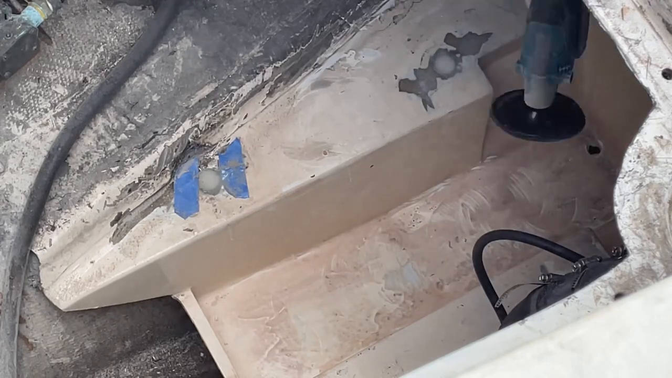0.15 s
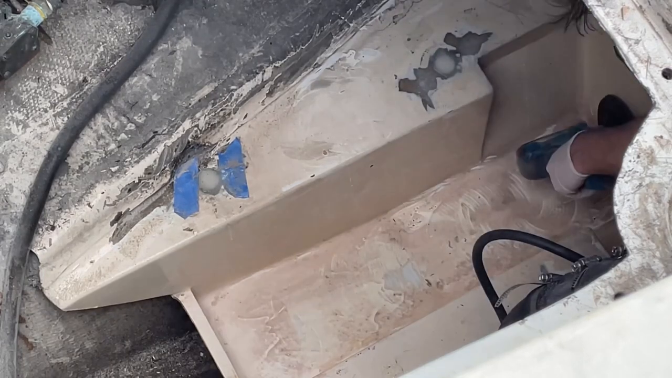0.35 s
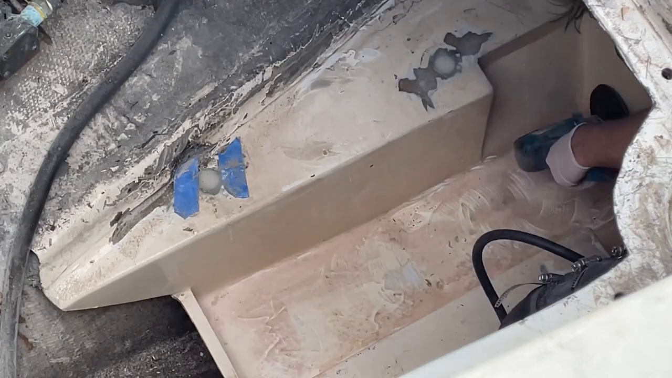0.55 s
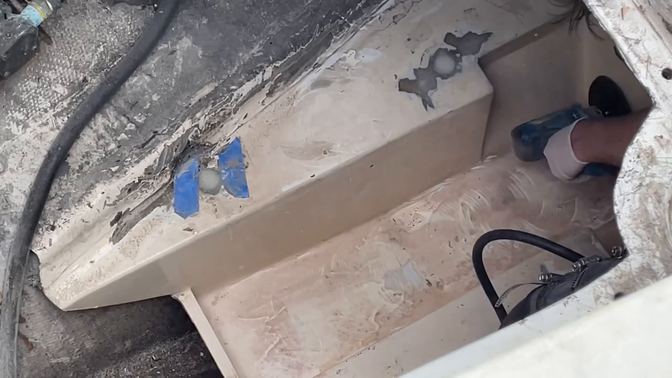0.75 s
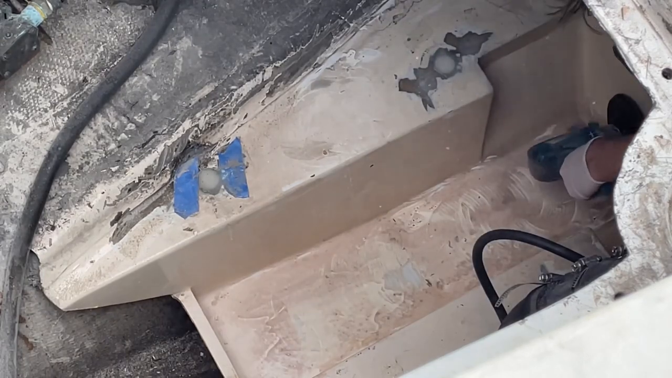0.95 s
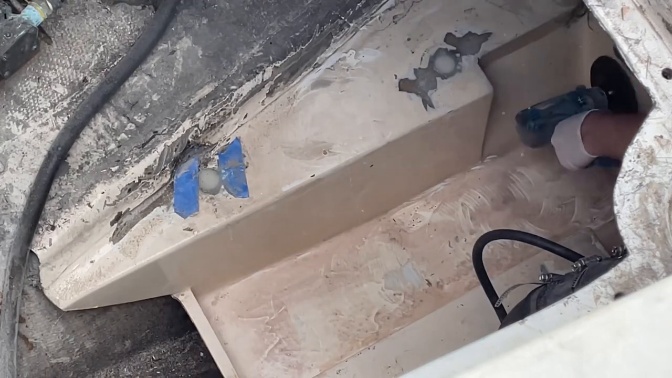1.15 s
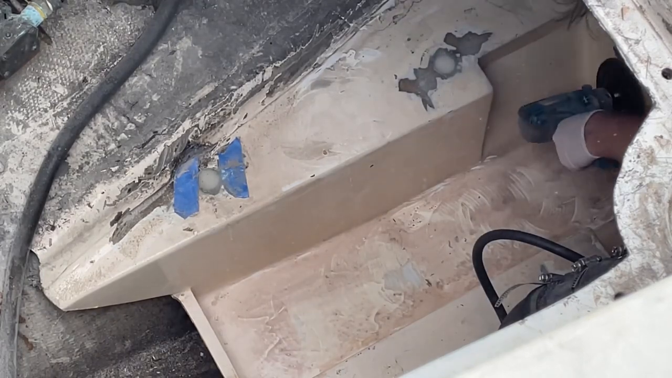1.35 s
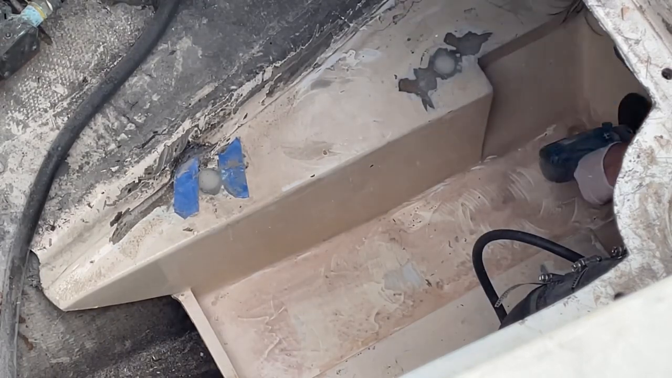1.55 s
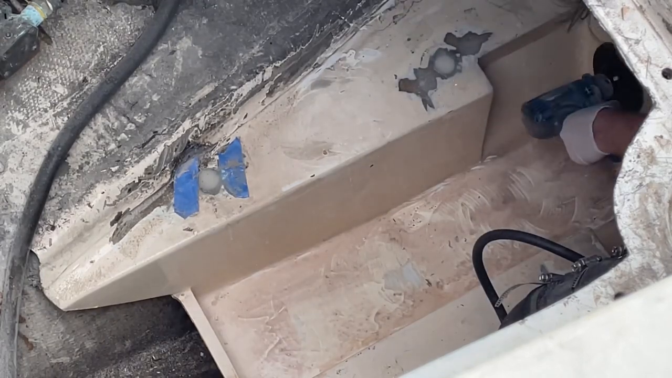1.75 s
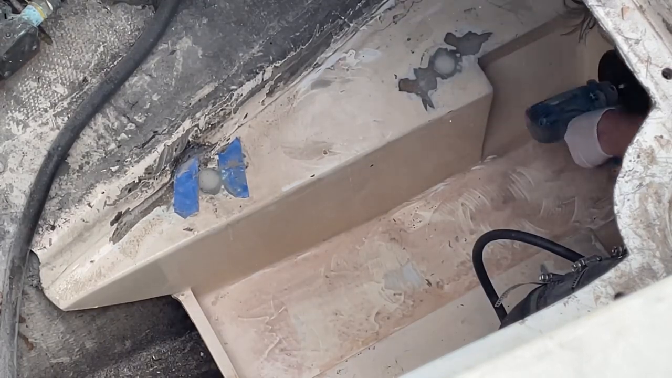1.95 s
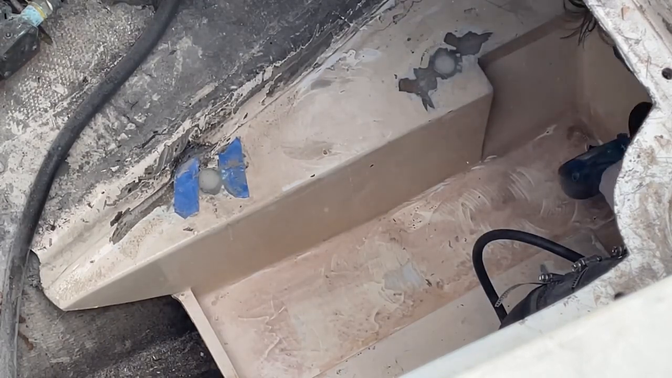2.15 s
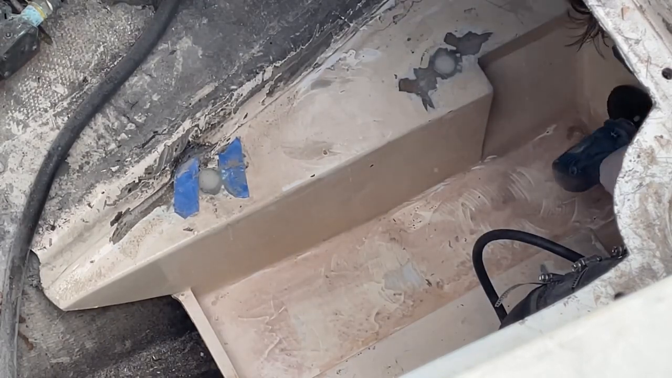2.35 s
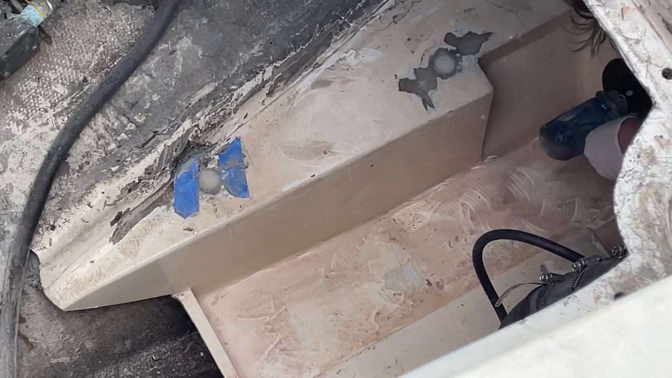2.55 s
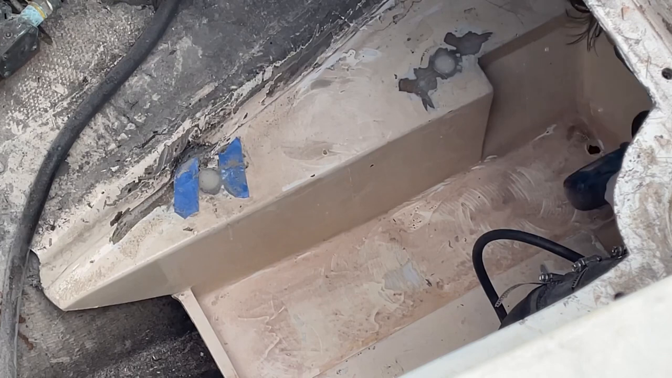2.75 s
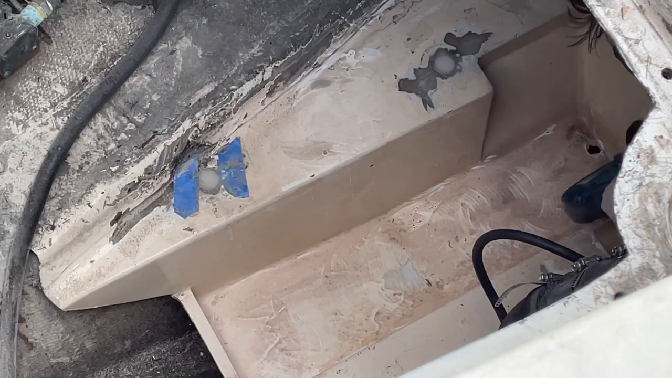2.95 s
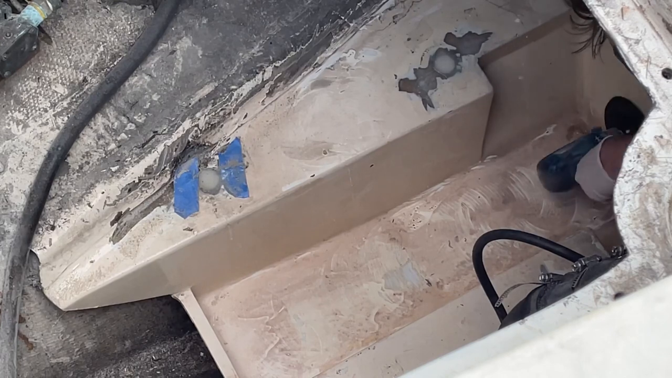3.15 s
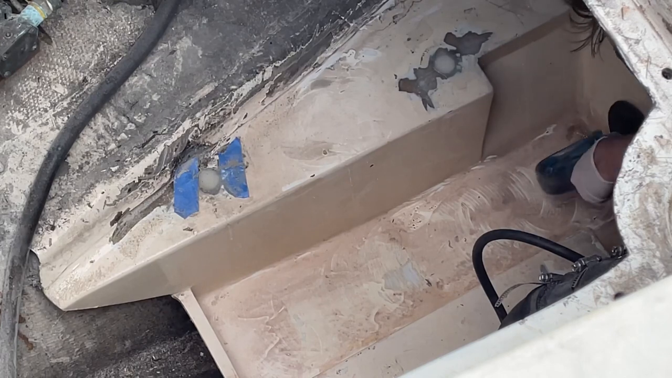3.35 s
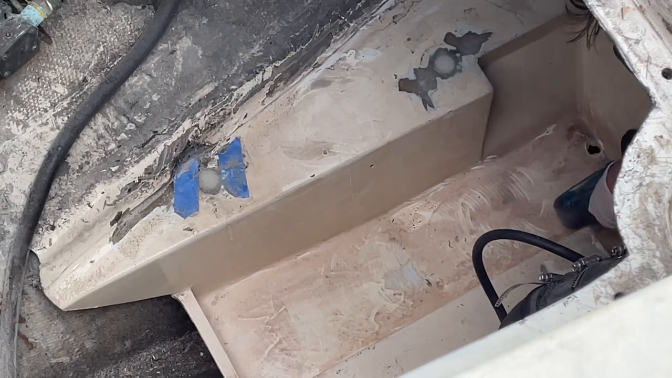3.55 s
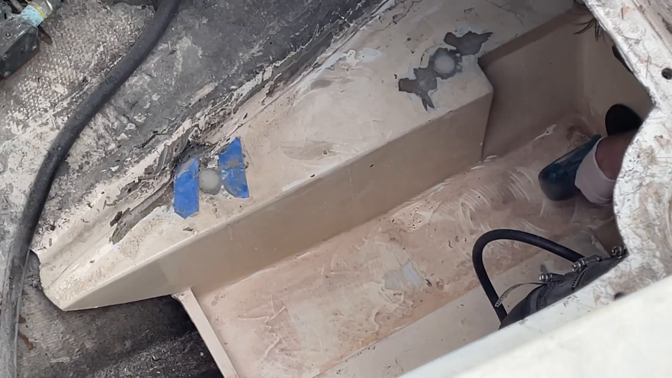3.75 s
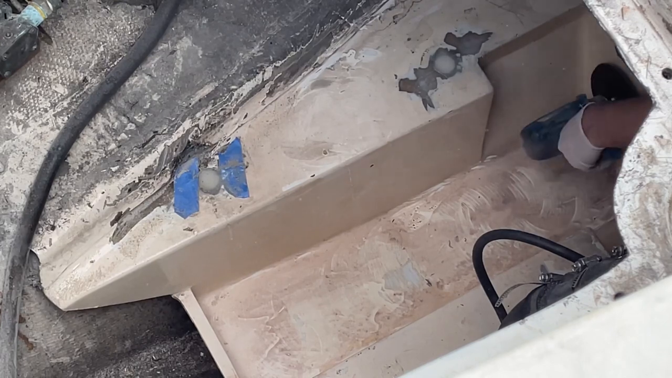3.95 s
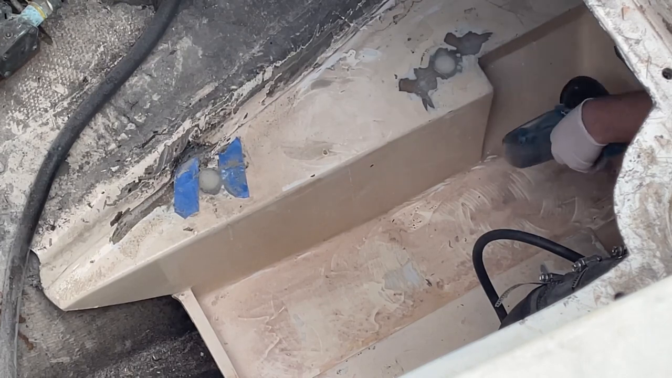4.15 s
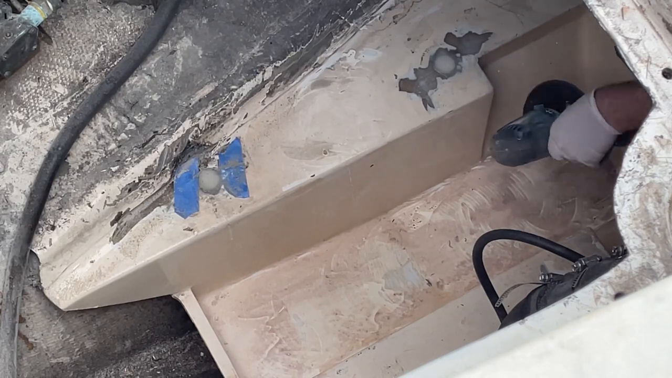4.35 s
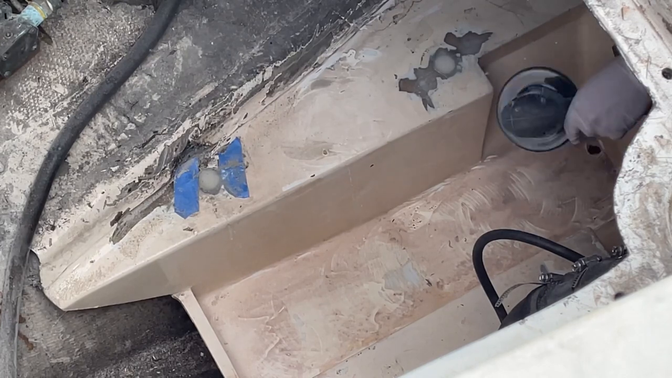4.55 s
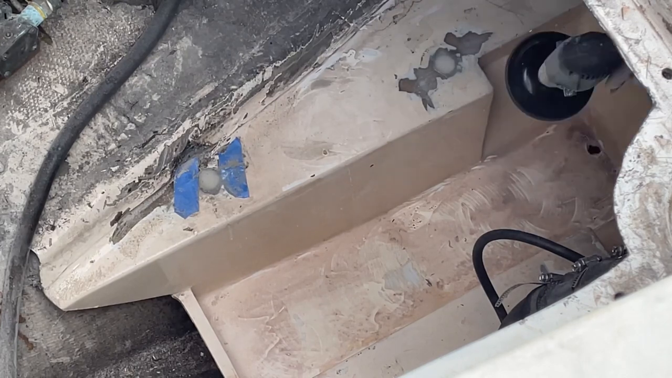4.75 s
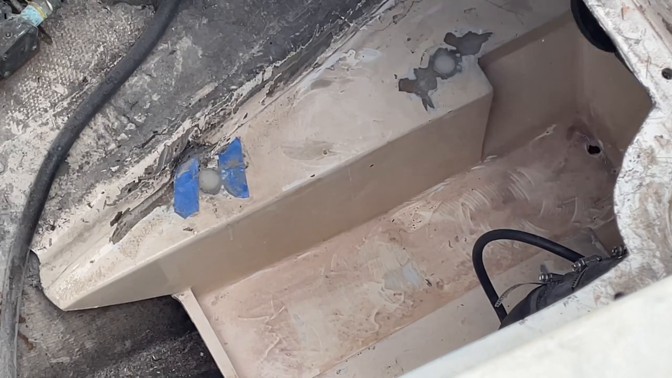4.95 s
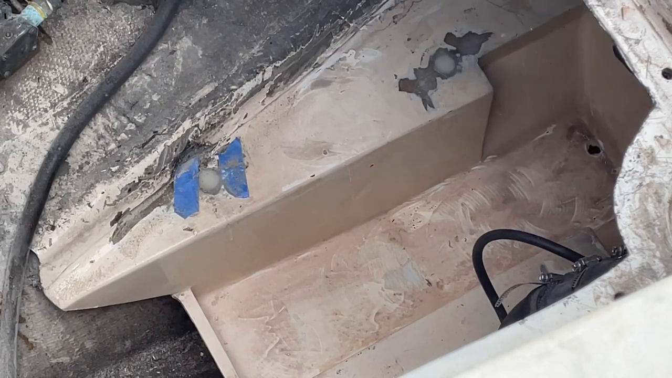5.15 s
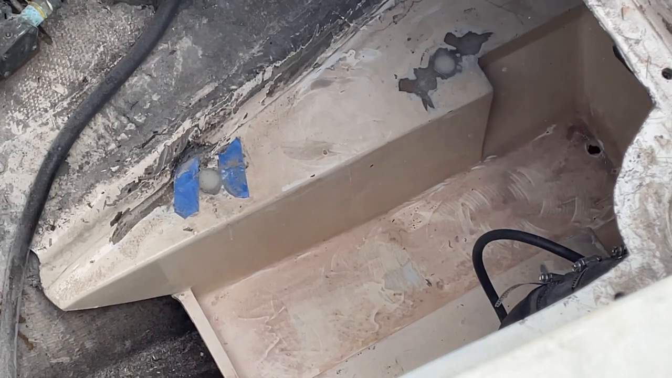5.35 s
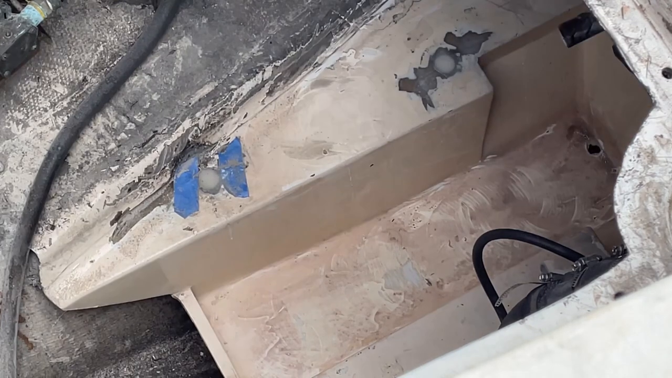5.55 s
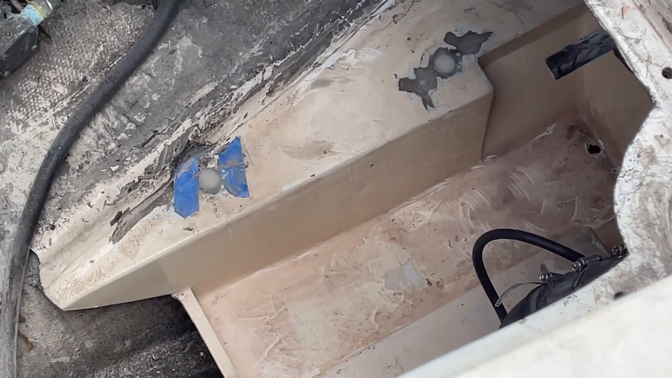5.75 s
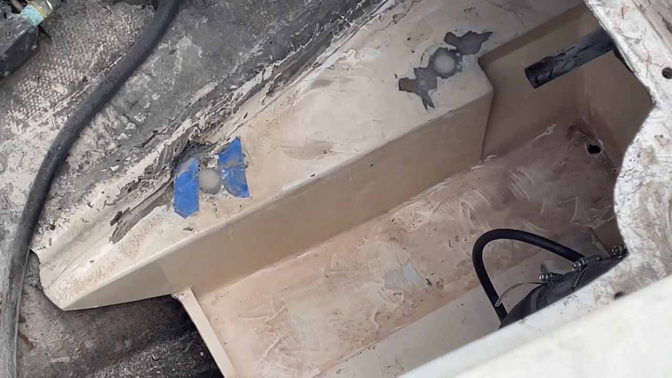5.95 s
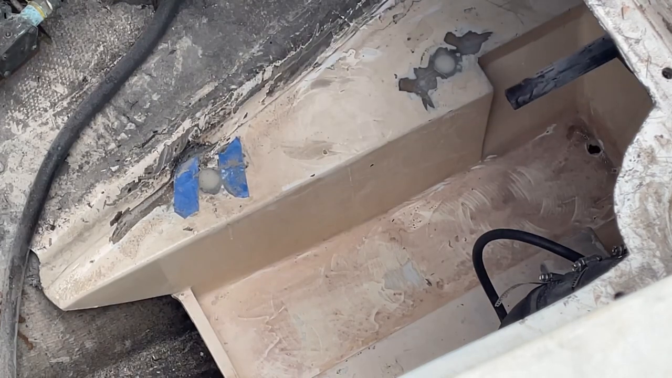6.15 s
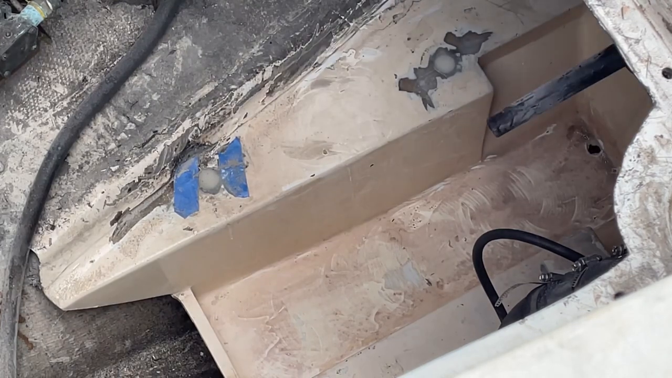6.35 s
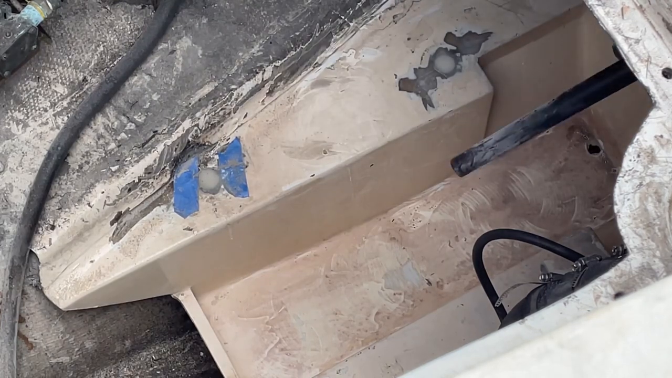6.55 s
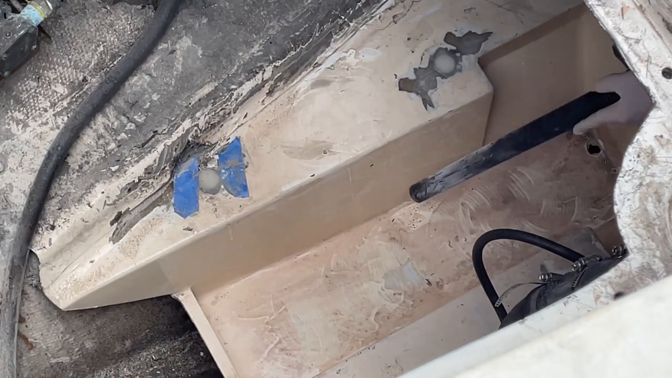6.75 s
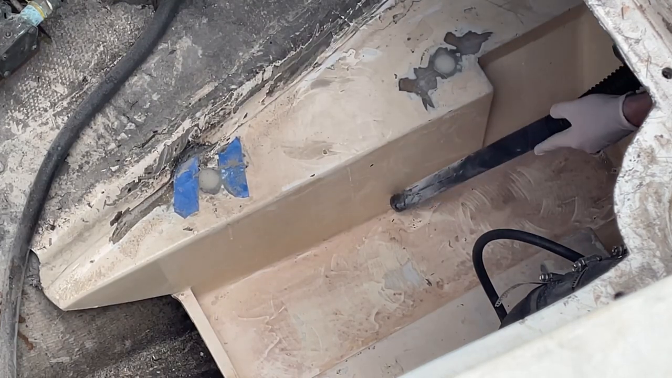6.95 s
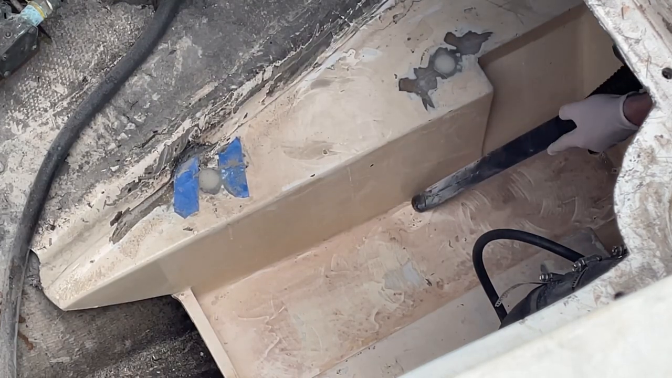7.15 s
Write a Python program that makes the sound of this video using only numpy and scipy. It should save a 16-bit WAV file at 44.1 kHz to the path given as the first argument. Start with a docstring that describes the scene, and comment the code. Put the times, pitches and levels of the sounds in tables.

```python
"""Sanding a boat hull, then vacuuming

Friction, periodic with each turn of a power sander's disc, forces a fiberglass hull to boom and ring
while the motor whines. Switched off, the sander coasts down until its sound breaks off. A shop vacuum
spins up, with turbulent airflow and rotor tones, and its hose drags over the hatch rim.
Both machines are heard in stereo, with parts of the treble out of phase between the channels."""
import sys
import numpy as np
from scipy import signal
from scipy.fft import rfft, irfft, next_fast_len
from scipy.io import wavfile
from scipy.ndimage import uniform_filter1d, map_coordinates

SR = 44100
rng = np.random.default_rng(int(sys.argv[2]) if len(sys.argv) > 2 else 0)


def wav_out(sig):
    """Save sig, one row per channel (or a flat mono array), as 16-bit PCM at SR to the path in sys.argv[1]."""
    wavfile.write(sys.argv[1], SR, np.round(np.clip(np.atleast_2d(sig).T, -1, 1) * 32767).astype(np.int16))


N = 316638
TIME = np.arange(N) / SR
ONSET_S = 0.3124  # the sanding cuts in abruptly at full speed
RELEASE_S, BREAK_S = 3.93, 5.47  # the disc leaves the hull; the sander's sound breaks off

# Disc speed, lower under load, higher in a skip: t/s, rotation f/Hz
DISC_SPEED = [(0.33, 68.8), (0.54, 69.8), (0.79, 68.9), (1.03, 69.6), (1.3, 68.2), (1.49, 68.5),
              (1.6, 69.8), (1.92, 68), (2.18, 69), (2.25, 71.6), (2.32, 71.2), (2.36, 67.8), (2.58, 68.8),
              (2.65, 72.3), (2.69, 71.8), (2.73, 68.1), (2.93, 70.1), (3.3, 67.5), (3.4, 68.3),
              (3.88, 67.2)]
# Pad contact: t/s, relative level/dB of grit, of buzz and of panel, ring centre f/Hz
PAD_CONTACT = [(0.33, -32, -38, -27.5, 1470), (0.36, -34.5, -37, -31, 1446), (0.75, -31, -42, -31, 1553),
               (1.06, -34, -37.5, -26.5, 1480), (1.19, -29.5, -41.5, -33.5, 1490),
               (1.46, -34, -42, -27, 1510), (1.63, -33, -36.5, -30.5, 1480),
               (1.83, -31.5, -43.5, -42.5, 1340), (2.04, -32.5, -41.5, -30, 1540),
               (2.18, -34, -39.5, -38.5, 1460), (2.34, -31, -41, -32.5, 1530),
               (2.49, -31.5, -34.5, -32.5, 1360), (2.57, -32, -41.5, -41, 1430),
               (2.86, -34, -41.5, -34.5, 1640), (3.07, -28.5, -40, -30.5, 1580),
               (3.32, -34.5, -44, -33, 1457), (3.58, -31, -40, -26, 1550), (3.81, -31, -44, -36, 1420),
               (3.9, -42.5, -46, -48, 1340)]
# Chatter in the corner: t/s, fractional speed jitter, irregular friction level/dB
DISC_CHATTER = [(0.5, .005, -9), (1.3, .0035, -14), (2.15, .005, -10), (2.3, .012, -3), (2.8, .007, -10),
                (3.05, .013, -2), (3.35, .008, -7), (3.6, .014, 1)]
def sanding():
    """Forced vibration: sliding friction drives the hull, its panel and the tool's body."""
    disc_hz, = curves(DISC_SPEED)
    grit_db, buzz_db, panel_db, centre_hz = curves(PAD_CONTACT)
    centre_hz = centre_hz + 20 * wobble(9)  # rocking shifts the ring from mode to mode
    jitter, chatter_db = curves(DISC_CHATTER)
    chatter = amp(chatter_db)
    turns = np.cumsum(disc_hz * (1 + jitter * wobble(35))) / SR
    sound = amp(grit_db + 6.5) * grit(turns)
    sound += amp(buzz_db) * buzz(turns, chatter)
    sound += amp(panel_db - 0.5) * panel(turns, chatter, centre_hz)
    sound += boom(disc_hz)
    body_hum = amp(-62) * ringing(noise(), [(90, 14.4, 0)])
    return (sound + body_hum) * during(ONSET_S, RELEASE_S + 0.023, rise=0.029, fall=0.053)


def friction(turns, renew_hz, points=128):
    """Quasi-periodic force: a pattern repeats each turn and is renewed as the tool travels."""
    pattern = rng.standard_normal((int(N * renew_hz / SR) + 4, points))
    return unit(map_coordinates(pattern, [TIME * renew_hz, turns % 1 * points], mode="grid-wrap"))


# Abrasion spectrum: f/Hz, relative level/dB
GRIT_SPECTRUM = [(100, -13), (300, 11), (700, -6), (1500, -11.5), (2300, -15.5), (3700, -12), (5000, -9),
                 (7000, -9.5), (10000, -9.5), (12000, -15.5), (15000, -13)]
# Modes of pad and housing: f/Hz, bandwidth/Hz, relative level/dB
PAD_MODES = [(2782, 150, 9), (4840, 1400, -2)]
def grit(turns):
    """Amplitude modulation: abrasion noise pulses as the pad rocks and grains catch at random."""
    rocking = .5 * np.cos(2 * np.pi * turns * 2) + np.cos(2 * np.pi * turns * 2 / 3)
    contact = unit(amp(0.28 * rocking + 0.78 * wobble(500) + 1.19 * wobble(40)))
    hiss = filtered(coloured(air(), GRIT_SPECTRUM), lambda f: highpass(f, 850, 4))
    return contact * (hiss + amp(-16) * ringing(air(), PAD_MODES))


# Response of the hull under the disc: f/Hz, relative level/dB
HULL_RESPONSE = [(140, -6.5), (300, -5.5), (450, 2.5), (750, 0.5), (1000, 0.5), (1170, -7.5), (2000, -4),
                 (3500, -2.5), (5000, -36)]
def buzz(turns, chatter):
    """Source and filter: the hull weights the harmonics of the friction force."""
    force = friction(turns, renew_hz=6) + .35 * chatter * noise()
    return even(coloured(force, HULL_RESPONSE))


# Modes of the sanded panel: f/Hz, bandwidth/Hz, relative level/dB
PANEL_MODES = [(1370, 36, 3.5), (1446.6, 30, 0), (1504, 46, 8), (1590, 46, 2), (1585, 520, 4),
               (1683, 38, 2.5)]
def panel(turns, chatter, centre_hz):
    """Modal excitation: the point of contact selects the modes that ring; chatter widens the choice."""
    force = friction(turns, renew_hz=12) + 2 * chatter * noise()
    reach_hz = 93 * (1 + 2 * chatter ** 2)
    return even(sum(amp(db) * ringing(force, [(hz, width, 0)]) * peak(centre_hz - hz, reach_hz)
                    for hz, width, db in PANEL_MODES))


# The hull's low mode: f/Hz, bandwidth/Hz, relative level/dB
HULL_MODE = [(224.3, 21, 0)]
# The boom, stuttering as the pad skips: t/s, relative level/dB
BOOM_LEVEL = [(0.33, -46.5), (0.61, -50), (0.64, -58), (0.87, -39.5), (1.27, -49), (1.51, -38), (1.56, -45),
              (1.59, -40), (1.8, -48.5), (2.37, -33), (2.43, -43), (2.59, -38), (2.62, -56), (2.7, -35.5),
              (2.73, -46), (2.83, -37.5), (2.88, -53), (2.94, -37), (3.03, -51), (3.22, -41), (3.25, -55),
              (3.41, -45), (3.51, -58), (3.6, -46), (3.64, -70), (3.71, -45), (3.74, -56), (3.86, -46),
              (3.9, -53)]
def boom(disc_hz):
    """Resonance: the disc's third harmonic lies near the hull's low mode."""
    level = amp(curves(BOOM_LEVEL)[0] - 0.5 + wobble(24))
    vibration = tone(3 * disc_hz) + amp(-13) * ringing(noise(), HULL_MODE)
    return level * vibration * during(ONSET_S, RELEASE_S, rise=0.0093, fall=.05)


# Squeals of the pad's edge: t/s, duration/s, f/Hz, level/dB
EDGE_SQUEALS = [(1.603, .23, 1257, -41.5), (2.257, 0.12, 1320, -38), (2.34, .08, 1490, -40),
                (2.4, .08, 1018, -40), (2.428, 0.098, 1445, -35.5), (2.69, .09, 1493, -36),
                (3.176, .1, 1340, -39), (3.737, 0.12, 1332, -38.5)]
# Hops of the pad: t/s, duration/s, level/dB
PAD_HOPS = [(2.318, 0.059, -40), (2.63, 0.11, -41), (3.08, 0.065, -46), (3.184, .05, -46)]
def catches():
    """Stick-slip: the pad's edge squeals with sagging pitch; its hops excite the hull's low mode."""
    out = np.zeros(N)
    for start, length, hz, db in EDGE_SQUEALS:
        sag = .1 * np.clip(TIME - start - length / 2, -length, length)
        squeal = tone(hz * (1 - sag + .006 * wobble(120)))
        out += amp(db) * squeal * during(start, start + length, rise=0.018, fall=0.022)
    for start, length, db in PAD_HOPS:
        note = tone(HULL_MODE[0][0] + 3 * wobble(29.4))
        out += amp(db) * note * during(start, start + length, rise=.02, fall=0.022)
    return out


# Whine under power, sagging with load: t/s, f/Hz
POWERED_PITCH = [(0.34, 15741), (1.12, 15740), (1.39, 15620), (2.26, 15721), (2.5, 15594), (2.92, 15725),
                 (3.25, 15542), (3.49, 15618), (3.85, 15368)]
# Coasting before and after the sanding: t/s, initial f/Hz, decay rate/(1/s)
COAST_DOWNS = [(0, 6360, .523), (3.85, 15380, .427)]
OFF_S, OFF_HZ = COAST_DOWNS[1][:2]
def motor_hz():
    """Exponential decay: unpowered, the motor loses a fixed share of its speed each second."""
    before, after = (hz * np.exp(-rate * (TIME - start)) for start, hz, rate in COAST_DOWNS)
    return np.select([TIME < ONSET_S, TIME < OFF_S], [before, curves(POWERED_PITCH)[0]], after)


# High whine under power, faint at first, then strong with brief dips: t/s, relative level/dB
POWERED_LEVEL = [(0.34, -64), (0.86, -39), (0.96, -68), (1.1, -28), (2.14, -31), (2.26, -40), (2.38, -28.5),
                 (2.86, -32.5), (3.3, -26), (3.4, -36), (3.6, -30), (3.84, -28.5)]
# Whine with the power off: t/s, relative level/dB
COASTING_LEVEL = [(0, -40), (.07, -51), (.31, -50.5), (3.9, -42), (4.05, -35.5), (4.5, -42.5),
                  (4.75, -35.5), (5.05, -40.5), (5.46, -49)]
def whine():
    """Interference: shifting echoes in the hull add to the motor's tone and make it flutter."""
    powered = during(ONSET_S, OFF_S + 0.1, rise=.01, fall=0.073)
    level = powered * amp(curves(POWERED_LEVEL)[0]) + (1 - powered) * amp(curves(COASTING_LEVEL)[0])
    echo = lambda: 0.51 * (wobble(22) + 2.2 * wobble(90))
    flutter = unit(np.hypot(1 + echo(), echo()))
    direct = tone(motor_hz() * (1 + 0.0009 * wobble(70)))
    return amp(3) * level * flutter * direct * during(-1, BREAK_S, rise=.1, fall=0.015)


def coasting():
    """Free rotation: off the hull, inertia keeps fan, gears and disc turning."""
    whine_hz = motor_hz()
    disc_hz = whine_hz / 227
    sound = fan(whine_hz / OFF_HZ, disc_hz) + gears(whine_hz) + lift_rasp(disc_hz) + tool_hum()
    free = 1 - during(ONSET_S, RELEASE_S, rise=0.0053, fall=0.28)
    return sound * free * during(-1, BREAK_S, rise=.1, fall=0.003)


# Spectrum of the cooling air: f/Hz, relative level/dB
FAN_SPECTRUM = [(150, -21), (350, -11), (700, -7), (1200, -5), (2500, -1.5), (3700, -5), (4700, 2.5),
                (7000, 2), (10000, 2.5), (15000, -8.5)]
# Modes of the hull's open well: f/Hz, bandwidth/Hz, relative level/dB
WELL_MODES = [(490, 13, -9), (1210, 150, -0.5), (2140, 170, -5), (3170, 790, 0.5)]
# The tool is taken out of the hull: t/s, relative level/dB
WITHDRAWAL = [(4.95, 0.5), (5.4, -3)]
def fan(speed, disc_hz):
    """Aerodynamic noise: level and treble fall as powers of speed; the disc swishes once a turn."""
    swish = amp(0.32 * tone(disc_hz) + 0.21 * wobble(25) + 0.82 * wobble(400))
    blow = coloured(air(), FAN_SPECTRUM) + amp(-13) * ringing(air(), WELL_MODES)
    low = filtered(blow, lambda f: peak(f, 7800, 6))
    level = amp(-36.5 + curves(WITHDRAWAL)[0]) * speed ** 1.57
    return level * swish * (low + speed ** 1.56 * (blow - low))


# Gear tones: multiple of the whine, level/dB off resonance, resonance f/Hz
GEAR_TONES = [(.0664, -72.5, 630), (.199, -71.5, 1780), (.332, -75, 2950), (.616, -64.5, 5450)]
def gears(whine_hz):
    """Swept resonance: each falling gear tone swells near the pitch at which it rings most."""
    out = np.zeros(N)
    for order, db, resonance_hz in GEAR_TONES:
        hz = order * whine_hz
        swell_db = 8.5 * peak(hz / resonance_hz - 1, 0.125, 4)
        out += amp(db + swell_db + 4 * wobble(22)) * tone(hz + 45 * np.sqrt(order) * wobble(250))
    return filtered(reverberant(out, t60=.08), lambda f: highpass(f, 500, 6))


# Modes that the rasp excites: f/Hz, bandwidth/Hz, relative level/dB
RASP_MODES = [(2183, 140, 0.5), (3250, 550, -5.5)]
def lift_rasp(disc_hz):
    """Cavity resonance: lifted out of the corner, the tool's rasp rings in the well."""
    level = amp(-48 + 1.9 * tone(disc_hz)) * during(4.43, 5.01, rise=.08, fall=.5)
    return level * ringing(air(), RASP_MODES)


def tool_hum(peak_s=4.93, db_per_s=12):
    """Narrow-band vibration: the coasting tool's hum swells and fades exponentially."""
    hum = tone(81 + 2 * wobble(17)) + amp(-9) * ringing(noise(), [(81.4, 30, 0)])
    return amp(-52 - db_per_s * np.abs(TIME - peak_s)) * hum


def vacuum(on_s=5.61, full_hz=399, time_constant_s=.22):
    """First-order spin-up: the turbine approaches full speed, and the flow grows as a power of it."""
    speed = 1 - np.exp(-np.maximum(TIME - on_s, .01) / time_constant_s)
    shaft_hz = full_hz * speed
    settled = speed ** 6
    airborne = airflow(speed) + rotor_tones(shaft_hz, speed, settled)
    hoot = tank_hoot(shaft_hz, settled)
    mains = amp(-48.5 + 0.58 * wobble(8.8)) * tone(np.full(N, 120)) * speed
    flow = amp(-30.5 + 0.46 * wobble(11)) * (0.096 + 0.904 * speed ** 1.44)
    return (flow * airborne + mains + hoot + whistles()) * during(on_s, 9, rise=0.0044, fall=.1)


# Spectrum of the suction: f/Hz, relative level/dB
FLOW_SPECTRUM = [(45, -1), (100, -3.5), (180, -7), (300, -1), (800, -0.5), (1500, -2.5), (2800, -2.5),
                 (4000, -6), (5000, -5.5), (7000, -7.5), (9500, -10), (12500, -21), (15000, -20.5)]
# Air columns of hose and wand: f/Hz, bandwidth/Hz, relative level/dB
PIPE_MODES = [(382, 42, -4.5), (498, 20, 2), (918, 15, 4), (1051, 17, 5.5), (1209, 27, 2), (1348, 35, 1),
              (1977, 14, 3), (2493, 61, -4), (2882, 32, 0.5), (4477, 44, 0), (4640, 23, -2),
              (5070, 20, -5.5)]
# The nozzle comes closer: t/s, relative level/dB
APPROACH = [(6.9, 1), (7.11, 4)]
def airflow(speed):
    """Turbulence: broadband noise excites the air columns and brightens with speed."""
    rush = amp(-2.5) * coloured(air(side_db=-20), FLOW_SPECTRUM)
    rush += amp(-5) * speed * ringing(air(side_db=-7), PIPE_MODES)
    low = filtered(rush, lambda f: peak(f, 900))
    treble_gain = .25 + .75 * speed ** 2.6
    return amp(curves(APPROACH)[0]) * (low / speed ** 0.2 + treble_gain * (rush - low))


# Turbine tones: multiple of the shaft, relative level/dB at start and at full speed, waver/Hz
ROTOR_ORDERS = [(2, -21, -16.5, 4), (5, -23, -22, 5), (9, -20, -16.5, 10), (11.9, -17, -24, 80),
                (18, -27, -26, 35)]
def rotor_tones(shaft_hz, speed, settled):
    """Frequency modulation: turbulence shakes the tones, most in spin-up; they swell near pipe modes."""
    shaken_hz = shaft_hz * (1 + .05 * (1 - speed) * wobble(300))
    out = np.zeros(N)
    for order, start_db, full_db, waver_hz in ROTOR_ORDERS:
        in_tune = np.max([peak(order * shaft_hz - hz, 90) for hz, _, _ in PIPE_MODES], axis=0)
        db = start_db + (full_db - start_db) * settled + 4 * in_tune
        flicker_db = (5 - 2 * settled) * wobble(25)
        out += amp(db + flicker_db) * tone(order * shaken_hz + waver_hz * wobble(150))
    return reverberant(out, t60=.07)


# Modes of the tank: f/Hz, bandwidth/Hz, level/dB
TANK_MODES = [(197, 280, -42.5), (313, 15, -36), (345, 30, -29)]
# Shaft tone once past those modes: t/s, relative level/dB
SHAFT_LEVEL = [(6.15, -51), (6.55, -56), (6.65, -40.5), (6.8, -55), (6.95, -41.5), (7.15, -36)]
def tank_hoot(shaft_hz, settled):
    """Swept resonance: the shaft's rising tone passes through the modes of the tank."""
    resonant = sum(amp(db) * peak(shaft_hz - hz, width / 2) ** 2 for hz, width, db in TANK_MODES)
    level = resonant + settled * amp(curves(SHAFT_LEVEL)[0])
    return level * amp(2 * wobble(60)) * tone(shaft_hz + 4 * wobble(70))


# Whistles of the nozzle: start t/s, end t/s, f/Hz, level/dB
NOZZLE_WHISTLES = [(6.57, 6.8, 4682, -43), (6.73, 6.94, 4485, -47)]
def whistles():
    """Flow-excited resonance: nearing the hull, the nozzle sounds one air column, then the next."""
    return sum(amp(db + 2 * wobble(40)) * tone(hz + 14 * wobble(200)) * during(start, end, .06, .06)
               for start, end, hz, db in NOZZLE_WHISTLES)


# Pulls over the rim: t/s, duration/s, level/dB, cutoff f/Hz
HOSE_PULLS = [(6.937, 0.044, -23.5, 1120), (7.072, 0.039, -20.5, 705)]
# Bumps on the hull: t/s, initial level/dB
HOSE_BUMPS = [(7.001, -11), (7.062, -18)]
def hose(rib_hz=200, thump_hz=68):
    """Friction and impact: ribs modulate the hose's rasp on the rim; bumps start damped oscillations."""
    out = np.zeros(N)
    for start, length, db, top_hz in HOSE_PULLS:
        ribs = noise() * amp(2 * tone(np.full(N, rib_hz)))
        rasp = unit(filtered(ribs, lambda f: highpass(f, 0.114 * top_hz, 2) * peak(f, top_hz, 4)))
        out += amp(db) * rasp * during(start, start + length + 0.022, rise=0.0052, fall=0.048)
    for start, db in HOSE_BUMPS:
        age = np.maximum(TIME - start, 0)
        envelope = amp(db - 60 * age / 0.073) * (1 - np.exp(-age / 0.0018))
        out += envelope * np.sin(2 * np.pi * thump_hz * age)
    return out


# Outdoor background: f/Hz, relative level/dB
YARD_SPECTRUM = [(50, 2.5), (85, -2), (320, -14), (500, -21), (2000, -34), (15000, -52)]
def yard():
    """Ambient noise: a faint rumble that steps up once the sander is silent."""
    return amp(np.where(TIME < BREAK_S, -67, -54)) * coloured(air(), YARD_SPECTRUM)


def reverberant(x, t60, wet_db=-7):
    """Reverberation: dense reflections in the hull make a gliding tone swell and fade."""
    t = np.arange(SR // 8) / SR
    tail = rng.standard_normal(len(t)) * amp(-60 * t / t60)
    wet = signal.fftconvolve(x, tail / np.linalg.norm(tail))[:N]
    return (x + amp(wet_db) * wet) / np.hypot(1, amp(wet_db))


def amp(db):
    """Decibels to gain."""
    return 10 ** (np.asarray(db) / 20)


def unit(x):
    """Normalisation to rms 1."""
    return x / np.sqrt(np.mean(x ** 2) + 1e-20)


def even(x):
    """Running normalisation to rms 1 over 0.1 s."""
    return x / np.sqrt(np.abs(uniform_filter1d(x ** 2, SR // 10)) + 1e-9)


def curves(rows):
    """Linear interpolation of each column after the time."""
    times, *columns = np.transpose(rows)
    return [np.interp(TIME, times, column) for column in columns]


def during(start, end, rise, fall):
    """A time gate with linear ramps."""
    return np.clip((TIME - start) / rise, 0, 1) * np.clip((end - TIME) / fall, 0, 1)


def wobble(rate):
    """Smooth random modulation, rate knots a second."""
    return map_coordinates(rng.standard_normal(int(N * rate / SR) + 4), [TIME * rate])


def tone(hz):
    """A sine of rms 1 whose phase integrates a frequency curve."""
    return np.sqrt(2) * np.sin(2 * np.pi * (np.cumsum(hz) / SR + rng.random())) * (hz < SR / 2)


def noise():
    """White noise."""
    return rng.standard_normal(N)


def air(side_db=-19.5):
    """Partial coherence: stereo white noise, common to both sides in the bass and less so above."""
    mid = noise()
    side = filtered(noise(), lambda f: amp(side_db) * highpass(f, 300, 4))
    return unit(np.array([mid + side, mid - side]))


def peak(offset, reach, order=2):
    """A bell curve, 1 at zero and half at reach; over frequency, a low-pass."""
    return 1 / (1 + (offset / reach) ** order)


def highpass(f, corner_hz, order):
    """High-pass gain, half at the corner."""
    return f ** order / (f ** order + corner_hz ** order)


def filtered(x, response):
    """Linear filtering by a complex frequency response."""
    size = next_fast_len(N + SR // 4)
    return irfft(rfft(x, size) * response(np.fft.rfftfreq(size, 1 / SR)), size)[..., :N]


def coloured(x, spectrum):
    """Spectral shaping by (f/Hz, level/dB) points, rolled off below the first, at rms 1."""
    hz, db = np.transpose(spectrum)
    gain = lambda f: amp(np.interp(np.log(f + 1), np.log(hz), db)) * np.minimum(f / hz[0], 1) ** 4
    return unit(filtered(x, gain))


def ringing(x, modes):
    """Modal superposition: x through steep-skirted resonances, at rms 1."""
    band = lambda f, hz, width: (2j * f * width / (hz * hz - f * f + 2j * f * width)) ** 2
    return unit(filtered(x, lambda f: sum(amp(db) * band(f, hz, width) for hz, width, db in modes)))


def scene():
    """Superposition in two channels; the low mids of vacuum and hose lean to the right."""
    lean = lambda f: amp(np.array([[-.75], [.75]]) * np.exp(-((f - 430) / 220) ** 2))
    return sanding() + catches() + whine() + coasting() + filtered(vacuum() + hose(), lean) + yard()


# Phase between left and right channels, held opposite around 7-8 kHz: f/Hz, phase/rad
CHANNEL_PHASE = [(2100, 0), (2700, .8), (3700, .5), (4500, .6), (5200, 0), (7100, 3.05), (8100, 3.25),
                 (11000, 6.28), (14000, 9.4), (15700, 10.6)]
def record(dry):
    """Phase difference: the two band-limited channels drift apart in phase towards the treble."""
    lead = lambda f: np.interp(f, *np.transpose(CHANNEL_PHASE))
    band = lambda f: (f < 15900) * highpass(f, 46, 4)
    return filtered(dry, lambda f: np.exp(.5j * np.outer([1, -1], lead(f))) * band(f))


dry = scene()
out = record(dry)
wav_out(out)
```